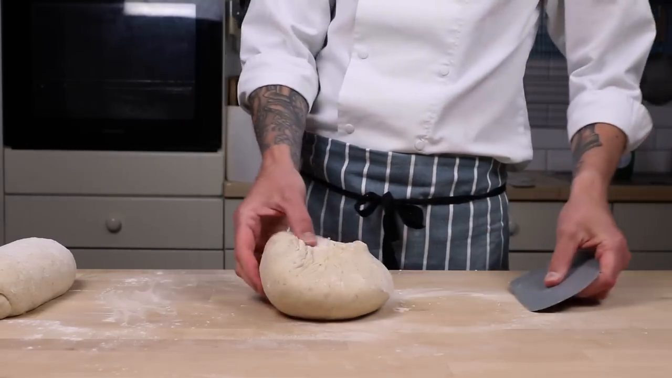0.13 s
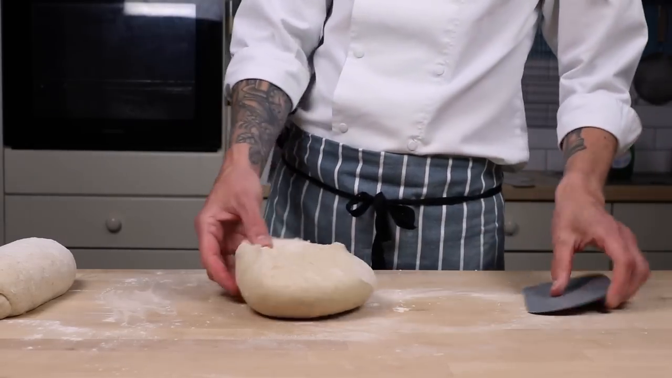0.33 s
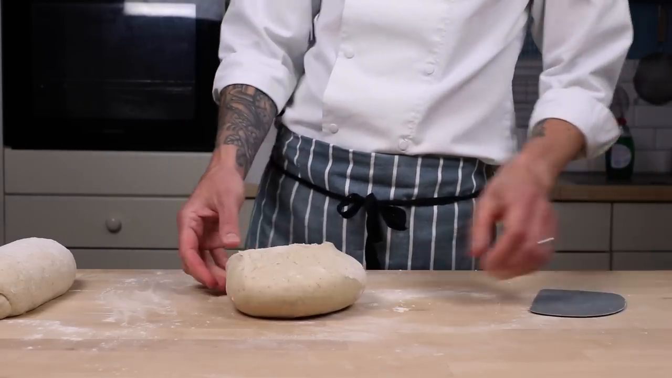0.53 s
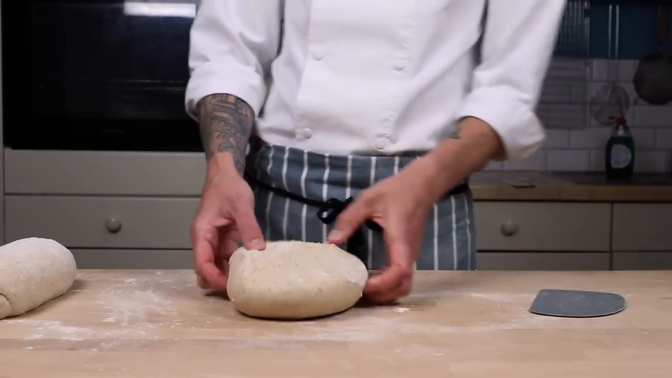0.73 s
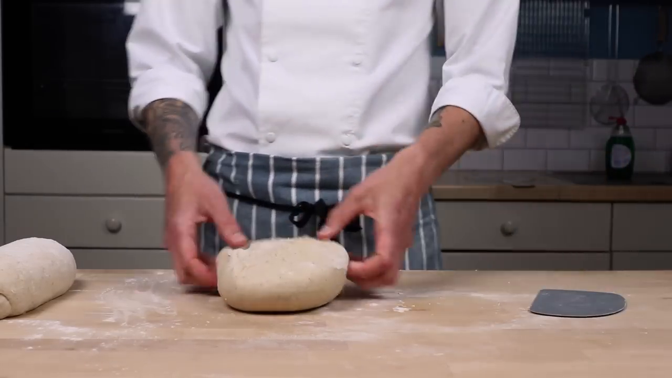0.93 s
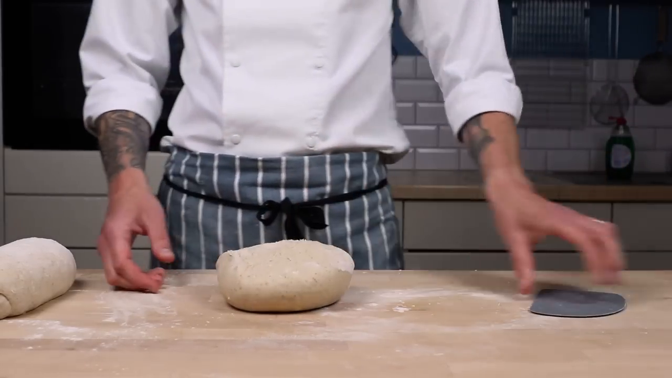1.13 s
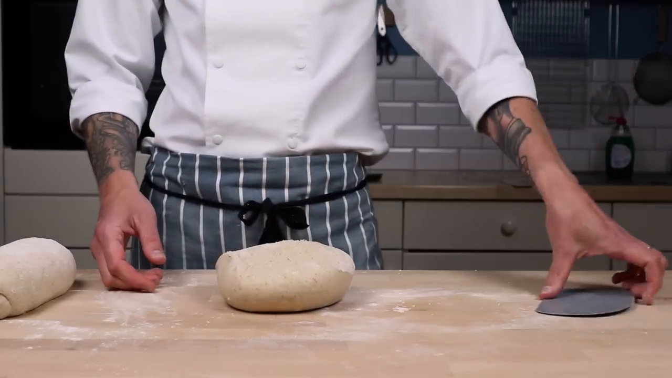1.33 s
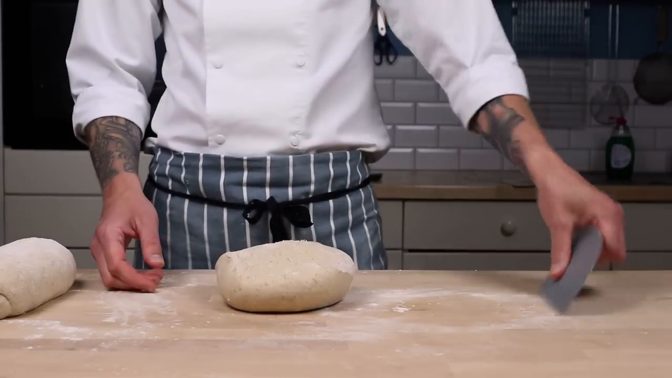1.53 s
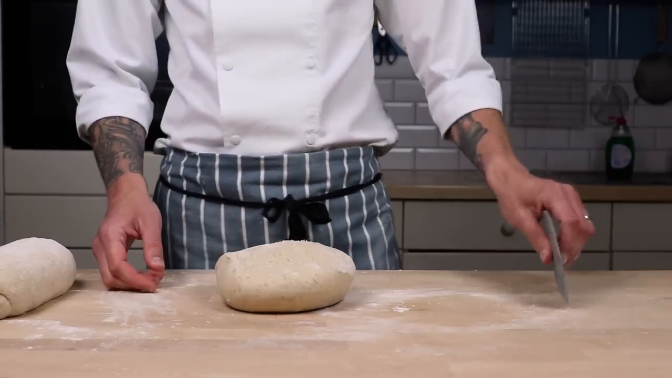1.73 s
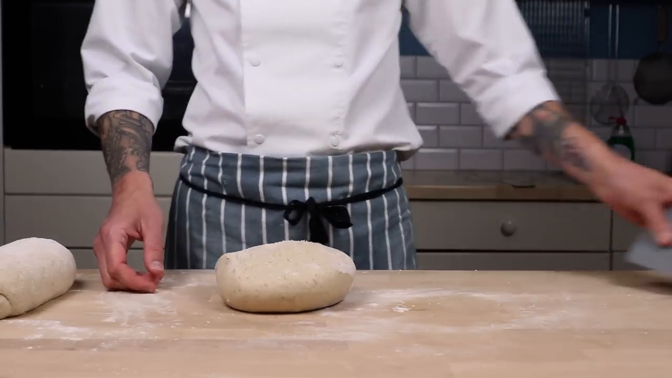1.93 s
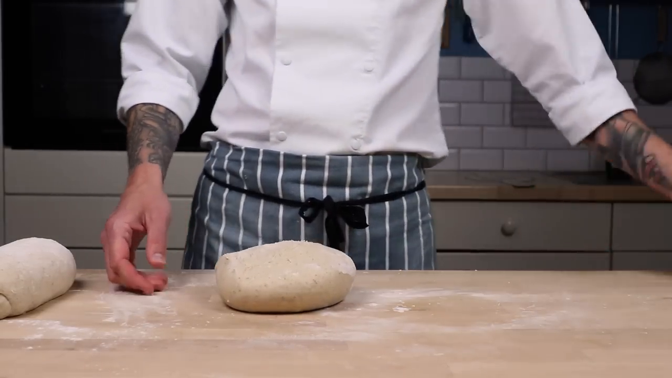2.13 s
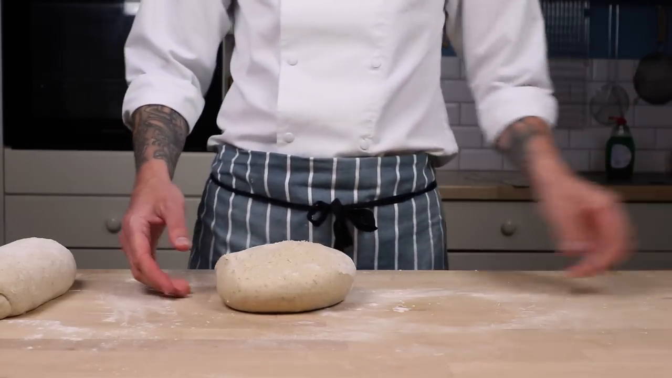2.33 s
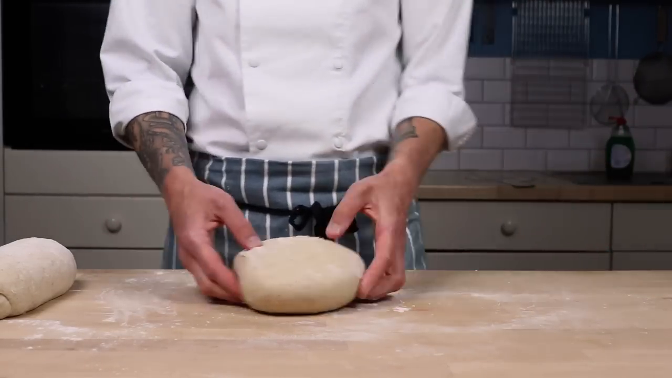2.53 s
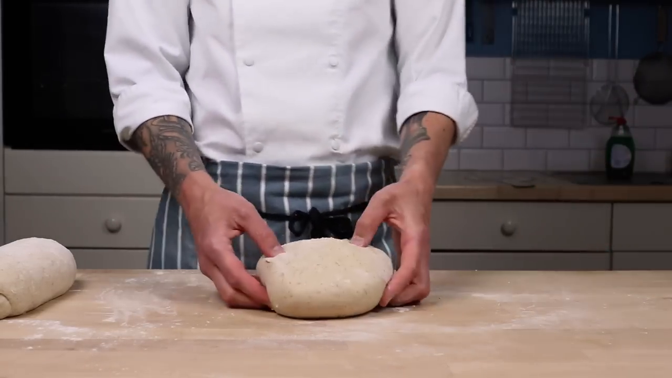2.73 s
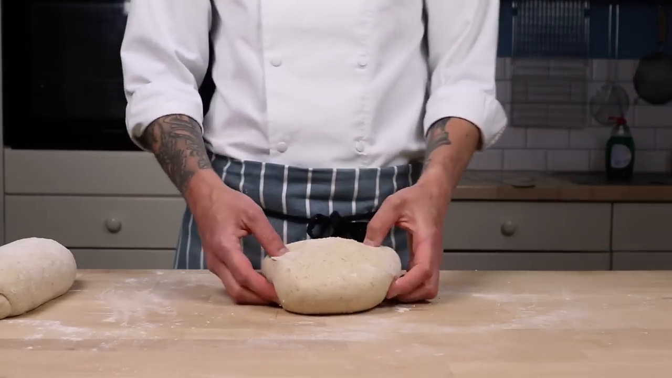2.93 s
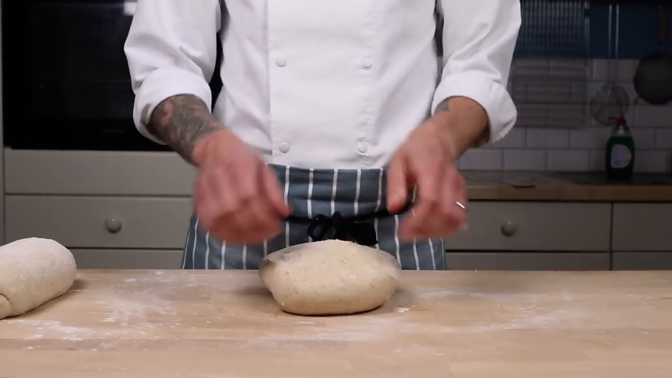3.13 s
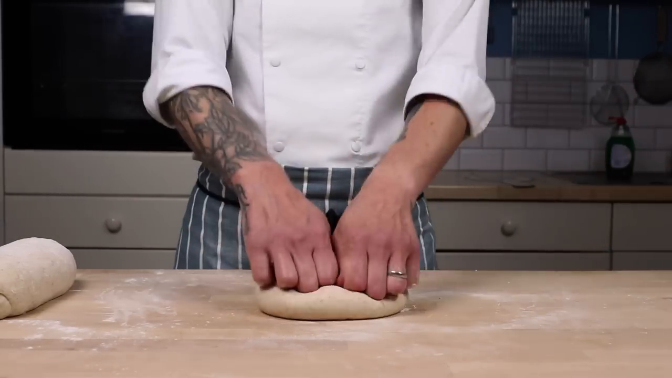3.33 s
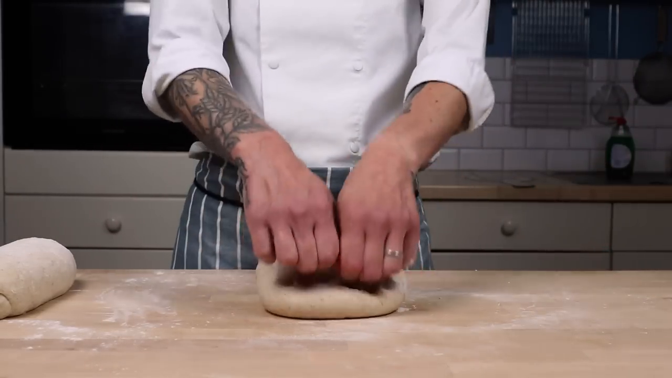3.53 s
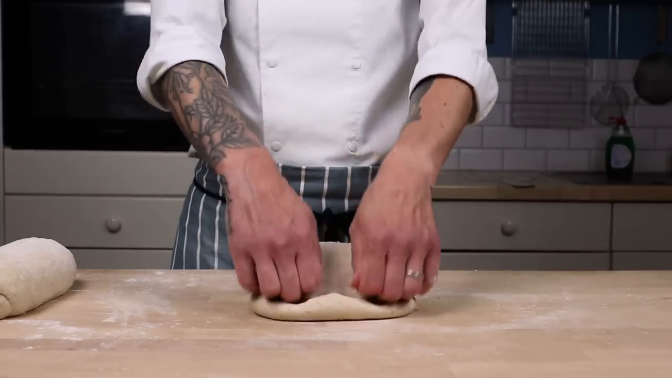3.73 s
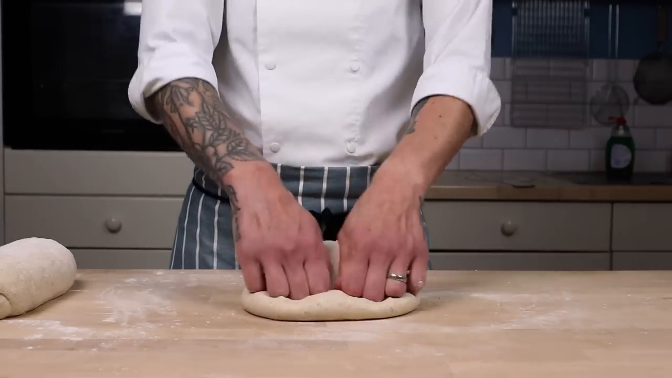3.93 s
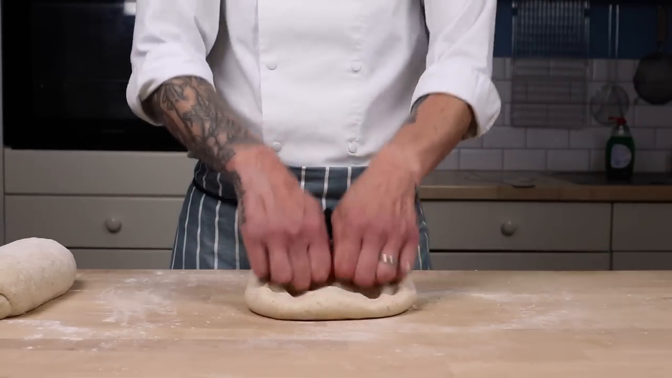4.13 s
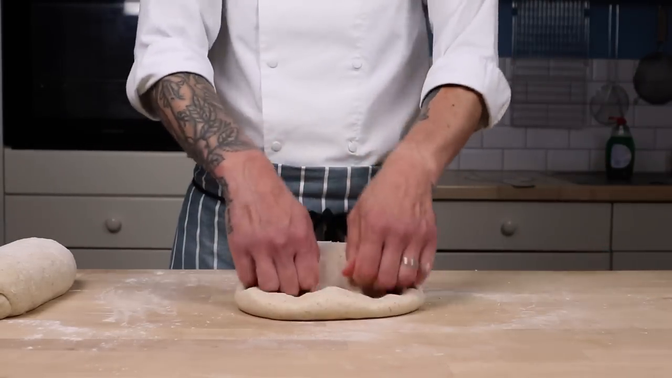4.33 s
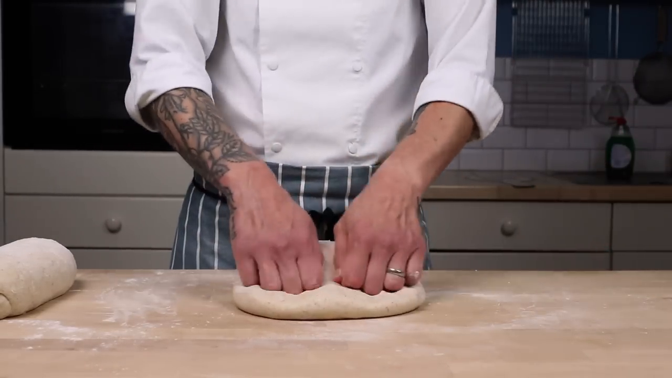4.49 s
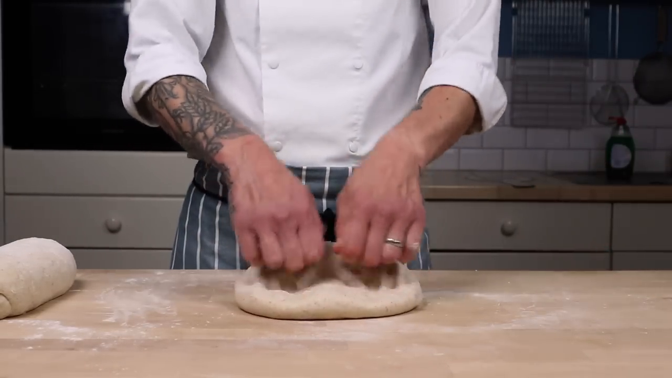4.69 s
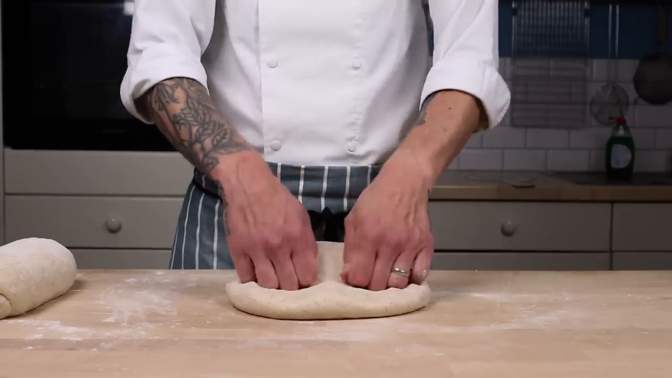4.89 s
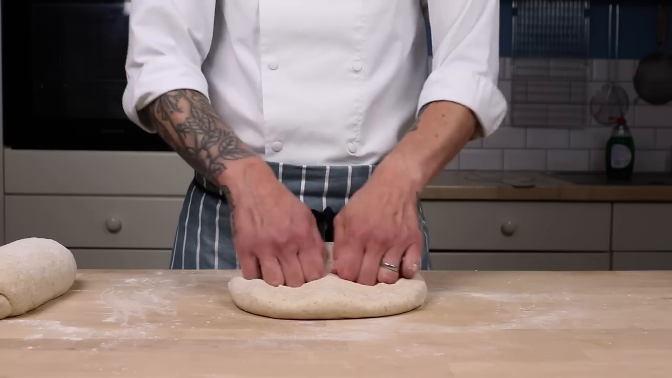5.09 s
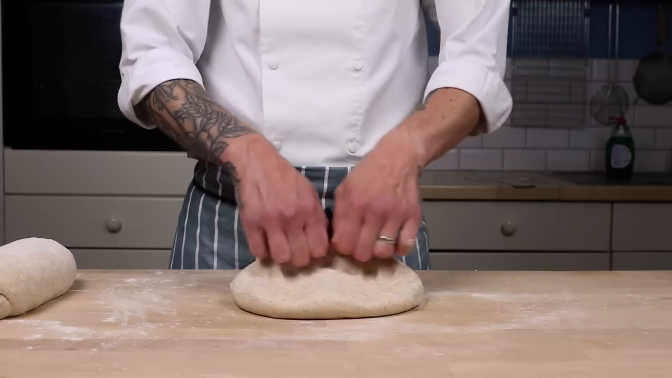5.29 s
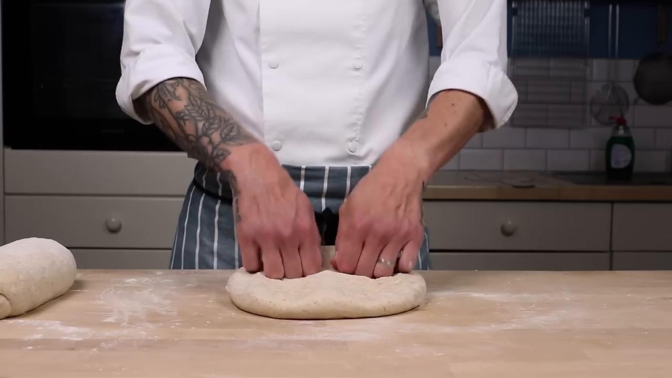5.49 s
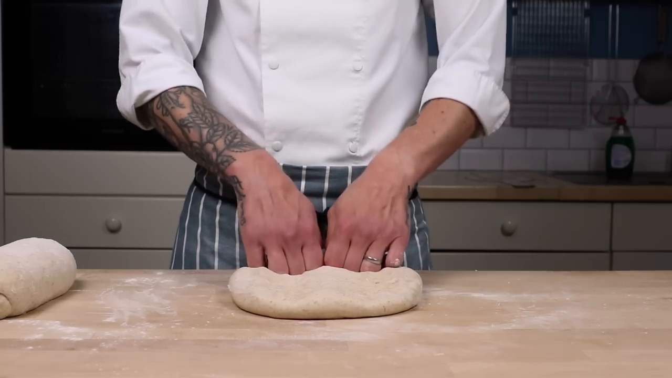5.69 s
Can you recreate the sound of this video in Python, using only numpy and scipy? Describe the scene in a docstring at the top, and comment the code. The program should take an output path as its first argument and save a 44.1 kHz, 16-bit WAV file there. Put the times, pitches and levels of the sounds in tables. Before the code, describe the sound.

Dough work on a solid wooden table, heard close with a short room echo. Soft pats and floury rustles come first, then scraper scrapes and one loud woody knock. Thin plastic rattles brightly as it lands right of centre. After a low thud and calmer swishes, a light tick and faint squeak lead into gentle fingertip presses, with steady low hum and hiss beneath.

```python
"""Hands turn and pat dough on a floured wooden worktop: swishes and drags (filtered grains), blows (pulses
and ringing wood modes) and scraper or nail ticks (snaps and ringing blade). A hard knock comes at 1.8 s, the
plastic scraper clatters down on the right at 2.2-2.4 s, a blow follows at 2.5 s, chirps (narrow noise) at
3.7 s, and from 3.9 s fingertips press dimples. Throughout: low rumble, hum and hiss as filtered noise, and a
short reverberation from decaying noise echoes."""
import sys
import numpy as np
from scipy import signal
from scipy.io import wavfile

SR = 44100
rng = np.random.default_rng(int(sys.argv[2]) if len(sys.argv) > 2 else 0)


def digitize_waveform(pressure):
    """Quantize a signal to 16-bit integers and store it at the path in sys.argv[1].

    Rows of a 2-D input are taken as channels; values are limited to [-1, 1].
    """
    field = np.atleast_2d(pressure).T
    bounded = np.clip(field, -1, 1)
    quanta = np.round(bounded * 32767).astype(np.int16)
    wavfile.write(sys.argv[1], SR, quanta)


N = 253575

# Steady hum and hiss: (frequency [Hz], relative density [dB per Hz])
AIR_COLOUR = [(30, -11), (60, 1), (110, -22), (145, 8), (190, 0.5), (300, -5), (500, -5.5), (900, -9),
              (2000, -12.5), (4400, -15.5), (8000, -20.5), (11300, -28.5), (14400, -23), (16000, -28)]
AIR_LEVEL_DB = -52.5
# Low rumble noise, its level wandering by chance: (time [s], level [dB])
RUMBLE_LEVEL = [(0.0, -63.5), (0.88, -63.5), (1.18, -76), (1.34, -54), (1.82, -60.5), (2.15, -78),
                (2.47, -58), (3.27, -73.5), (3.88, -63.5), (4.39, -57), (4.68, -62), (5.75, -58.5)]
RUMBLE_BAND_HZ = (62, 98)
# Reverberation: (frequency [Hz], t60 [s], level [dB])
KITCHEN_DECAY = [(373, 0.68, -13), (1105, 0.56, -7), (2730, 0.52, -16.5), (7950, 0.19, -16.5)]
# Stereo likeness of diffuse sound: (frequency [Hz], left-right correlation [0-1])
STEREO_LIKENESS = [(60, 0.86), (350, 0.85), (600, 0.73), (2000, 0.22), (8000, 0.31), (16000, 0.034)]
# Stereo balance of grain textures: (frequency [Hz], left minus right [dB])
STEREO_BALANCE = [(100, 1), (700, 1.5), (3000, 0), (12000, -3.5)]
# Thin high chirps: (time [s], level [dB], fall [s])
CHIRPS = [(3.709, -39, .012), (3.719, -50, .012), (3.726, -36, 0.013), (3.74, -53.5, .2), (3.816, -53, .01)]
CHIRP_HZ, CHIRP_RESONANCE_WIDTH_HZ, CHIRP_RISE_S = 8900, 900, 0.0058
# Worktop modes: (frequency [Hz], struck level [dB], undamped t60 [s])
WORKTOP_MODES = [(142.5, 1.5, 0.94), (194.7, -13.5, 0.32), (244, -25, 0.11), (319.5, -5, 0.16),
                 (380.5, -12, 0.31), (395.8, -9.5, 0.23), (446.7, -10, 0.16), (533, 1, 0.062),
                 (688, 2, 0.14), (786.7, 6.5, 0.13), (815.5, -3, 0.57), (834, -1, 0.31), (900, -21, 0.085),
                 (1120, -31, 0.16), (1046, -14, 0.072), (1260, -12, 0.12), (1670, -47, 0.33),
                 (1830, 11.5, 0.067), (2260, 2.5, 0.25), (2500, -1, 0.24), (3420, -14, .12)]
SWELL_CYCLES = 3.4   # time constant of build-up: a heavy slab takes a few swings to reach full ring
# Weight shifting on the worktop; 1.88: low ring after the knock:
# (time [s], level [dB], rise [s], fall [s], colour centre [Hz])
MURMUR_STROKES = [(.018, -59, 0.029, 0.14, 205), (.228, -57.5, 0.26, 0.2, 314),
                  (.548, -47, 0.25, 0.064, 366), (.772, -38, 0.037, 0.22, 244),
                  (1.326, -39, .016, 0.49, 255), (1.52, -46.5, 0.14, 0.091, 360),
                  (1.694, -61.5, .2, .17, 294), (1.88, -38, 0.085, 0.19, 390), (2.31, -40, 0.11, 0.17, 230),
                  (2.476, -39, 0.42, 0.077, 263), (2.55, -48, .05, 0.39, 260),
                  (2.852, -47, 0.0073, 0.58, 276), (3.152, -55, .3, 0.19, 242),
                  (3.42, -61, 0.056, .26, 175), (3.8, -53.5, 0.18, 0.16, 230)]
# Blows on the worktop; hands and dough damp the wood: (time [s], contact level [dB], contact centre [Hz],
# ring against contact [dB], spread over modes [octaves], ring length [fraction of t60])
WORKTOP_BLOWS = [(0.5164, -35.5, 380, 9.5, 0.2, 0.58), (.751, -27.5, 566, -27, 0.48, 0.4),
                 (0.7782, -30.5, 246, -14, 0.25, 0.4), (0.809, -36, 453, -16, .5, 0.37),
                 (.84, -40, 600, -21, 0.42, 0.4), (1.255, -43.5, 517, -5.5, 0.65, 0.8),
                 (1.324, -36, 295, -6, 0.68, 0.8), (1.371, -36, 726, -19, 0.65, 0.8),
                 (1.4851, -49.5, 386, 22.5, 0.14, 0.8), (1.811, -6, 1015, -12, 0.85, 0.3),
                 (1.8157, -23.5, 381, 19, 0.081, 0.62), (1.848, -22, 826, -12, 0.4, 0.82),
                 (1.864, -31, 1150, -15, 0.45, 0.8), (1.872, -24.5, 410, 8.5, 0.065, 0.83),
                 (2.465, -21.5, 530, -24, 0.58, 0.5), (2.469, -27.5, 253.6, 7, 0.26, 1),
                 (2.5497, -30.5, 245, 8.5, 0.38, 0.9), (2.853, -34.5, 450, -8, 0.45, 0.46),
                 (2.871, -35, 280, 2, 0.32, 0.4), (3.3813, -37, 327, 14, 0.087, 0.55),
                 (3.389, -47.5, 141, 13.5, 0.1, 0.36), (3.678, -45, 142, 14.5, 0.19, 0.34),
                 (3.69, -31.5, 469, 14.5, 0.14, 0.63), (3.713, -50, 460, -6, 0.31, 0.5),
                 (3.959, -44, 585, -12, 0.39, .5), (4.417, -51, 141, 0, .15, 0.9),
                 (4.578, -50.5, 260, 10, 0.28, 0.9), (4.73, -56, 142, 12, 0.13, 0.88),
                 (4.747, -54.5, 388, 19, 0.12, 0.62), (4.869, -53, 143, 8, .15, 0.4),
                 (5.119, -39, 202, 10, 0.28, 0.7)]
# Scraper edge and fingernails ticking: (time [s], tick level [dB], centre [Hz], left minus right [dB],
# blade ring against tick [dB])
SCRAPER_TICKS = [(0.518, -30, 3200, 2, -7), (1.344, -34, 2700, -2, -8), (1.365, -31.5, 2500, 8, -2),
                 (1.659, -26.5, 2240, -11, -4), (1.8107, -15, 2800, -2, 0), (2.1575, -31, 2580, -9, -27),
                 (2.158, -27.5, 1380, 0, -22), (2.1642, -32, 1500, -3, -22), (2.226, -31, 1200, -3, -17),
                 (2.229, -29, 4500, -5, -13), (2.234, -37, 1400, -6, -17), (2.24, -32, 1520, 0, -15),
                 (2.2776, -6, 5350, -5, -6), (2.2838, -23.5, 2070, -4, 7), (2.2879, -14, 6800, -8, -19),
                 (2.293, -8, 2800, -5, -9), (2.309, -27.5, 2060, 2, 11), (2.3532, -11.5, 6300, -8.5, -20),
                 (2.359, -26, 1850, 4, 6.5), (2.398, -18, 2400, 7, -4), (2.4008, -14, 2200, -13, -25),
                 (2.405, -17, 2530, 1, 5), (2.4105, -39.5, 2560, -8, -29), (2.4151, -23, 2370, 8, -29),
                 (3.38, -35.5, 3000, -11, -7), (3.636, -52, 1800, 1, -16), (3.6745, -29, 3700, -2, -36),
                 (3.691, -18, 3600, 4, -31), (3.6938, -28, 2540, -6, -30), (3.7106, -32, 3460, -1, -20),
                 (3.956, -38.5, 1950, 4, -5), (4.276, -32, 2930, -1, -16), (4.594, -44, 1500, -3, -11),
                 (4.8493, -35.5, 1800, 3, -22), (5.429, -35, 2500, 1, -27), (5.6618, -32, 3000, 0, -25)]
# Scraper blade modes: (frequency [Hz], level [dB], t60 [s])
BLADE_MODES = [(1720, -4, 0.019), (2050, -5, 0.032), (2363, -31, 0.017), (2390, -10, 0.018),
               (2730, -12, 0.025)]
LEFT_LAG_SAMPLES = 4   # the scraper lies nearer the right microphone
SPLASH_DB, SPLASH_DECAY_S = -11.5, 0.0017   # decay is a time constant
CRACK_HZ, CRACK_DB, CRACK_DB_PER_OCTAVE = 12000, -7, 14   # sharp tick edge, stronger on higher ticks
# Scraper and dough dragged over the wood; 1.833: scraper judder after the knock:
# (time [s], level [dB], rise [s], fall [s], colour centre [Hz], half-width at -6 dB [octaves])
DRAG_STROKES = [(.078, -59, .1, 4.2, 1400, 0.75), (.41, -44, .03, 0.23, 1460, 0.38),
                (.44, -35.5, 0.046, 0.2, 1480, 1), (.766, -44.5, 0.037, 0.35, 850, 1),
                (.826, -47, .1, 0.066, 1120, .95), (.936, -53, 0.062, 0.22, 1880, .95),
                (1.255, -47.5, 0.014, 0.072, 1090, 0.54), (1.31, -42, 0.01, 0.17, 2500, 1),
                (1.366, -40, 0.097, 0.044, 2550, 0.35), (1.464, -42.5, 0.085, .3, 2290, 0.97),
                (1.54, -42.5, .02, 0.65, 1400, .7), (1.664, -32, 0.028, .12, 1410, .95),
                (1.75, -44, .2, 0.093, 1090, 0.88), (1.833, -27, .009, 0.21, 1100, 0.87),
                (2.158, -42.5, .004, 0.18, 1370, 1), (2.228, -36.5, .006, 0.053, 1400, .8),
                (2.3, -32, .021, 0.18, 2020, 0.21), (2.409, -28, 0.017, .1, 2240, 0.67),
                (2.5, -40.5, 0.18, 0.33, 1820, 1), (2.72, -43.5, 0.94, 0.16, 1530, 1),
                (3.1, -51, 0.86, 0.11, 1440, 1), (3.16, -44.5, 0.065, 0.057, 1410, 0.91),
                (3.38, -48.5, .008, 0.17, 1610, 1), (3.691, -45.5, 0.011, 0.17, 1500, 0.33)]
# Skin, flour and sleeves moving: (time [s], level [dB], rise [s], hold [s], fall [s],
# tilt up to 11 kHz [dB per octave], offset above 11 kHz [dB])
SWISH_STROKES = [(.068, -56, 0.06, 0.0011, 0.068, -2, -2.5), (.322, -53, 0.67, 0.055, .1, -0.5, -8),
                 (0.45, -43, 0.21, 0.011, 0.17, 2.4, -1.1), (0.527, -45, 0.13, .001, .1, -5, -9),
                 (0.771, -42, .03, .001, .06, 3, 3), (0.791, -41.5, 0.048, 0.013, 0.11, 2.5, -1.5),
                 (.935, -41.5, 0.053, 0.054, 0.075, 2, -8), (1.047, -53, 0.07, 0.19, 0.16, 1, -4),
                 (1.338, -39, 0.082, .001, 0.37, .1, -3), (1.478, -46, 0.054, .01, .05, 8, -7),
                 (1.548, -44, .05, .04, 0.33, 0, -1), (1.659, -36, 0.025, .001, 0.1, -2.5, -7),
                 (1.77, -52, .2, 0.015, .02, -12, -8), (1.807, -41, .007, 0.024, 0.087, -10, -5),
                 (1.962, -47.5, 0.29, .001, 0.14, 1.5, -12), (2.26, -52, 0.15, .001, .05, 0, -4),
                 (2.289, -27.5, 0.011, .001, 0.11, -7.5, -18), (2.317, -34, .05, .001, 0.32, -3.5, -13),
                 (2.5, -45, .2, .03, .1, 0, -8), (2.548, -40, 0.033, 0.035, 0.16, 6, 2),
                 (2.642, -42, 0.11, .11, .11, 2.5, -9), (2.896, -61, 0.12, .05, 0.093, -1, -12),
                 (3.02, -46.5, 0.27, 0.0013, 0.11, 0, -8), (3.156, -44.5, 0.19, .001, 0.042, 0.2, -7),
                 (3.394, -46, .04, .001, 0.12, 3.5, -1.5), (3.57, -49, 0.16, .001, .035, 2, -5),
                 (3.676, -48, .006, .001, .05, 2.1, -12), (3.689, -44.5, .02, 0.027, 0.072, -2, -10)]
# Common swish colour: (frequency [Hz], relative density [dB per Hz])
SWISH_DENSITY = [(1200, -24), (3000, 1.5), (6000, -3.5), (9000, -7), (11000, -15), (13500, -4),
                 (16000, -5.5)]
# Fingertips pressing dimples into dough: (time [s], swish level [dB], swish rise [s], swish fall [s],
# drag level [dB], weight on the worktop [dB])
DOUGH_PRESSES = [(3.86, -45, 0.15, .065, -62, -67), (4.01, -48, 0.13, .083, -54, -53),
                 (4.15, -46.5, 0.13, 0.17, -58, -57), (4.28, -49, .05, 0.13, -52, -48.5),
                 (4.44, -46, 0.082, 0.31, -53, -61), (4.59, -51.5, 0.066, 0.065, -53, -45.5),
                 (4.75, -43, 0.058, 0.06, -48, -72), (4.89, -49.5, 0.087, 0.096, -54, -49),
                 (5.05, -46.5, 0.076, .15, -52, -50), (5.19, -51, 0.096, 0.14, -54, -53),
                 (5.35, -46, 0.064, 0.13, -49.5, -56), (5.44, -50.5, .1, 0.15, -60, -54),
                 (5.645, -45, 0.046, .07, -47.5, -50), (5.75, -55.5, .15, .05, -52, -65)]
PRESS_TILT_DB_PER_OCTAVE, PRESS_TOP_DB = 0.5, -5.5
PRESS_DRAG_HZ, PRESS_DRAG_OCTAVES, PRESS_DRAG_TIME_RATIO = 1820, 0.94, 0.59   # ratio to swish times
PRESS_WEIGHT_HZ, PRESS_WEIGHT_RISE_S, PRESS_WEIGHT_FALL_S = 202, 0.062, 0.12
STROKE_SWING_DB = 20   # stroke rise and fall times each span this change
BAND_EDGES_HZ = 28 * 2 ** np.arange(0, 9.4, .4)
CUTOFF_HZ = 15900


def from_db(db):
    """Decibels to gain."""
    return 10 ** (np.asarray(db) / 20)


def rms_one(x):
    """Scale to rms 1."""
    return x / np.sqrt(np.mean(x ** 2) + 1e-20)


def in_time(rows):
    """Interpolate curve columns to every sample."""
    time_s, *columns = np.transpose(rows)
    return [np.interp(np.arange(N) / SR, time_s, column) for column in columns]


def at_hz(points, hz, axis=1):
    """Read a table column on a log-frequency axis."""
    points = np.array(points)
    return np.interp(np.log(hz), np.log(points[:, 0]), points[:, axis])


def drift(rate_hz):
    """Slow random curve of rms 1: noise through two equal low-pass poles, at 1/40 of the sample rate."""
    pole = np.exp(-80 * np.pi * rate_hz / SR)
    noise = rng.standard_normal(N // 40 + 2002)
    slow = signal.lfilter([1], [1, -2 * pole, pole * pole], noise)[2000:]   # drop the start-up
    return np.interp(np.arange(N) / 40, np.arange(len(slow)), rms_one(slow))


def ring(force, hz, t60_s):
    """Two-pole resonator: a unit click sets off a decaying sine of height about 1."""
    radius, angle = from_db(-60 / (t60_s * SR)), 2 * np.pi * hz / SR
    return signal.lfilter([0, np.sin(angle)], [1, -2 * radius * np.cos(angle), radius ** 2], force + 1e-18)


def hump_db(hz, centre_hz, octaves):
    """Colour falling on both sides of a centre, -6 dB at the given octaves."""
    return -6 * (np.log2(hz / centre_hz) / octaves) ** 2


def sides(db):
    """Left and right gains for a level difference."""
    return from_db(np.array([[db / 2], [-db / 2]]))


def diffuse_pair(mid, side, hz):
    """Mix two independent noises to the left-right correlation at hz."""
    alike = np.clip(at_hz(STEREO_LIKENESS, hz), 0, 1)
    return np.sqrt(1 + alike) * mid + np.sqrt(1 - alike) * side * [[1], [-1]]


def bands(first_hz, last_hz):
    """Yield band centres and band-pass filters."""
    for low, high in zip(BAND_EDGES_HZ, BAND_EDGES_HZ[1:]):
        if low >= first_hz and high <= last_hz:
            yield np.sqrt(low * high), signal.butter(2, [low, high], "band", fs=SR, output="sos")


def texture(colour_db, first_hz, last_hz, grain_db, patchy_db):
    """Stereo grains through a filter bank; each band flickers, overall power is evened over time."""
    grain_gain = from_db(grain_db * np.minimum(rng.exponential(1, N), 5))
    grains = rng.standard_normal((2, 2, N)) * grain_gain
    out, power = 0, 0
    for k, (hz, sos) in enumerate(bands(first_hz, last_hz)):
        mid, side = signal.sosfilt(sos, grains[k % 2] / grains.std())
        gain = from_db(colour_db(hz))
        flicker = from_db(patchy_db * drift(21))
        out = out + gain * flicker * diffuse_pair(mid, side, hz) * sides(at_hz(STEREO_BALANCE, hz))
        power = power + gain ** 2 * hz   # bandwidth grows with hz
    return rms_one(out / np.sqrt(power))


def strokes(start_s, db, rise_s, hold_s, fall_s, *colours):
    """Strokes rise, hold and fall evenly in dB; powers add and weight the colours."""
    t = np.arange(0, N + 32, 32)[:, None] / SR
    before = np.maximum(start_s - t, 0) / np.abs(rise_s)
    after = np.maximum(t - start_s - np.abs(hold_s), 0) / np.abs(fall_s)
    power = from_db(db - np.minimum(STROKE_SWING_DB * (before + after), 200)) ** 2
    total = power.sum(axis=1)
    blended = [power @ colour / total for colour in colours]
    return in_time(np.transpose([t[:, 0], 10 * np.log10(total)] + blended))


def add_contact(out, time_s, db, hz, cycles, turn_rad=0):
    """Add a contact force: a short windowed cosine centred on its moment, without offset."""
    half = round(cycles * SR / hz)
    t = np.arange(-half, half + 1) / SR
    pulse = np.cos(2 * np.pi * hz * t - turn_rad) * np.hanning(len(t))
    out[round(time_s * SR) - half:][:len(t)] += from_db(db) * (pulse - pulse.mean())


def air():
    """Steady hum and microphone hiss as coloured noise."""
    colour = lambda hz: at_hz(AIR_COLOUR, hz)
    return from_db(AIR_LEVEL_DB) * texture(colour, 20, 20000, grain_db=.1, patchy_db=.4)


def rumble():
    """Low rumble: noise in one low band at a wandering level."""
    sos = signal.butter(3, RUMBLE_BAND_HZ, "band", fs=SR, output="sos")
    low = signal.sosfilt(sos, rng.standard_normal(N))
    return from_db(in_time(RUMBLE_LEVEL)[0]) * rms_one(low)


def kitchen(x):
    """Dense echoes swell over milliseconds and die band by band; low bands are more alike on both sides."""
    t = np.arange(SR) / SR
    echoes, tail = rng.standard_normal((2, SR)), 0
    for hz, sos in bands(250, 20000):
        decay = from_db(-60 * t / at_hz(KITCHEN_DECAY, hz)) * (1 - np.exp(-t / 0.002))
        mid, side = signal.sosfilt(sos, echoes) * decay / np.sqrt(np.sum(decay ** 2))
        tail = tail + from_db(at_hz(KITCHEN_DECAY, hz, axis=2)) * diffuse_pair(mid, side, hz)
    return signal.fftconvolve(x[None], tail, axes=1)[:, :N]


def squeak():
    """Thin chirps: noise twice through a narrow resonance."""
    t60_s = 2.2 / CHIRP_RESONANCE_WIDTH_HZ
    once = ring(rng.standard_normal(N), CHIRP_HZ, t60_s)
    narrow = ring(once, CHIRP_HZ, t60_s)
    time_s, db, fall_s = np.transpose(CHIRPS)
    level_db = strokes(time_s, db, CHIRP_RISE_S, 0, fall_s)[0]
    return from_db(level_db) * rms_one(narrow)


def murmur_strokes():
    """Level and colour centre of the murmur from shifting weight, presses and the knock's low ring."""
    pressed = [(s, db, PRESS_WEIGHT_RISE_S, PRESS_WEIGHT_FALL_S, PRESS_WEIGHT_HZ)
               for s, *_, db in DOUGH_PRESSES]
    time_s, db, rise_s, fall_s, hz = np.transpose(MURMUR_STROKES + pressed)
    return strokes(time_s, db, rise_s, 0, fall_s, hz)


def worktop_murmur():
    """Noise keeps only the low modes murmuring, at half their t60."""
    level_db, centre_hz = murmur_strokes()
    murmur = 0
    for hz, _, t60_s in WORKTOP_MODES:
        if hz < 600:
            damped = rms_one(ring(rng.standard_normal(N), hz, .5 * t60_s))
            murmur = murmur + damped * from_db(hump_db(hz, centre_hz, 0.56))
    return from_db(level_db) * rms_one(murmur)


def worktop_blows():
    """Each blow is a contact pulse plus ringing modes, strongest near the contact's centre."""
    mode_hz, mode_db, t60_s = np.transpose(WORKTOP_MODES)[:, :, None]
    t = np.arange(SR * 2 // 5) / SR
    swings = np.sin(2 * np.pi * mode_hz * t) * (1 - np.exp(-t * mode_hz / SWELL_CYCLES))
    struck = np.zeros(N + SR)
    for time_s, db, hz, ring_db, spread, length in WORKTOP_BLOWS:
        strength_db = db + ring_db + mode_db + hump_db(mode_hz, hz, max(spread, .08))
        decay_db = -60 * t / (t60_s * length)
        ringing = np.sum(swings * from_db(strength_db + decay_db), axis=0)
        struck[round(time_s * SR):][:len(t)] += ringing
        add_contact(struck, time_s, db, hz, cycles=1.2)
    return struck[:N]


def splash():
    """Tiny bright rattles trail every tick: decaying, grainy noise."""
    force = np.zeros((2, N))
    for time_s, db, _, pan_db, _ in SCRAPER_TICKS:
        force[:, round(time_s * SR)] = from_db(db + SPLASH_DB) * sides(pan_db)[:, 0]
    fade = signal.lfilter([1], [1, -np.exp(-1 / (SPLASH_DECAY_S * SR))], force + 1e-18)
    rattle = rng.standard_normal((2, N)) * from_db(8.8 * np.minimum(rng.exponential(1, N), 4))
    sos = signal.butter(1, [1800, 8000], "band", fs=SR, output="sos")
    return signal.sosfilt(sos, fade * rms_one(rattle))


def scraper():
    """Each tick is a two-way snap with a sharp edge that also rings the thin plastic blade."""
    time_s, tick_db, tick_hz, pan_db, blade_db = np.transpose(SCRAPER_TICKS)
    at = np.round(time_s * SR).astype(int)
    left, right, blade = np.zeros(N), np.zeros(N), 0
    for hz, mode_db, t60_s in BLADE_MODES:
        force = np.zeros(N)
        force[at] = from_db(tick_db + blade_db + mode_db + hump_db(hz, tick_hz, 0.48))
        blade = blade + ring(force, hz, t60_s)
    quarter = np.pi / 2
    for moment_s, db, hz, pan in zip(time_s, tick_db, tick_hz, pan_db):
        left_s = moment_s + LEFT_LAG_SAMPLES / SR
        add_contact(left, left_s, db + pan / 2, 0.66 * hz, cycles=0.51, turn_rad=quarter)   # duller off axis
        right_db = db - pan / 2
        add_contact(right, moment_s, right_db, hz, cycles=1.0, turn_rad=quarter)
        edge_db = right_db + CRACK_DB + CRACK_DB_PER_OCTAVE * np.log2(hz / 5000)
        add_contact(right, moment_s, edge_db, CRACK_HZ, cycles=.8, turn_rad=quarter)
    return np.array([left + np.roll(blade, LEFT_LAG_SAMPLES), right + blade])


def drag():
    """Drag and judder on the wood: patchy grains coloured by a hump that moves with the contact."""
    pressed = [(s, db, PRESS_DRAG_TIME_RATIO * rise, PRESS_DRAG_TIME_RATIO * fall,
                PRESS_DRAG_HZ, PRESS_DRAG_OCTAVES)
               for s, _, rise, fall, db, _ in DOUGH_PRESSES]
    time_s, db, rise_s, fall_s, hz, width = np.transpose(DRAG_STROKES + pressed)
    level_db, centre_hz, octaves = strokes(time_s, db, rise_s, 0, fall_s, hz, width)
    colour = lambda hz: hump_db(hz, centre_hz, np.maximum(octaves, .2))
    return from_db(level_db) * texture(colour, 400, 6000, grain_db=2.5, patchy_db=2.0)


def swish():
    """Fine flour grains under skin and cloth: a hiss with each move."""
    pressed = [(s, db, rise, 0, fall, PRESS_TILT_DB_PER_OCTAVE, PRESS_TOP_DB)
               for s, db, rise, fall, *_ in DOUGH_PRESSES]
    level_db, tilt, top_db = strokes(*np.transpose(SWISH_STROKES + pressed))

    def colour(hz):
        """Common density, tilted about 6 kHz or offset at the top."""
        return at_hz(SWISH_DENSITY, hz) + (top_db if hz > 11000 else tilt * np.log2(hz / 6000))

    return from_db(level_db) * texture(colour, 900, 20000, grain_db=3.0, patchy_db=0.4)


def scene():
    """Mix room, worktop, scraper and hands; murmur, air and rumble skip the reverberation."""
    background = air() + rumble()
    murmur = worktop_murmur()
    hits = squeak() + worktop_blows() + splash() + scraper()
    near = drag() + swish()
    room = kitchen(from_db(15.5) * hits.mean(axis=0) + from_db(6.0) * near.mean(axis=0))
    return background + room + murmur + hits + near


def record(dry):
    """The microphone loses the deepest bass; a steep filter cuts the top."""
    thin = signal.sosfilt(signal.butter(2, 48, "high", fs=SR, output="sos"), dry)
    return signal.sosfilt(signal.cheby2(14, 60, CUTOFF_HZ * 1.02, fs=SR, output="sos"), thin)


dry = scene()
out = record(dry)
digitize_waveform(out)
```